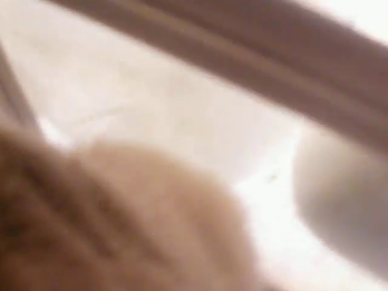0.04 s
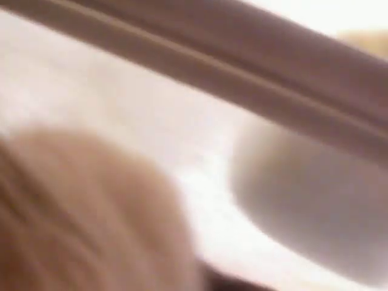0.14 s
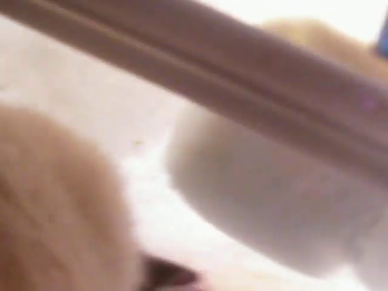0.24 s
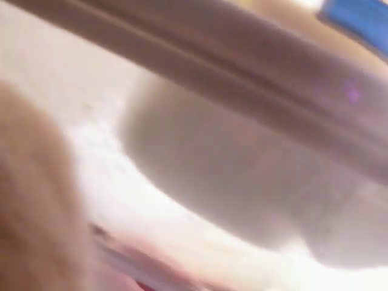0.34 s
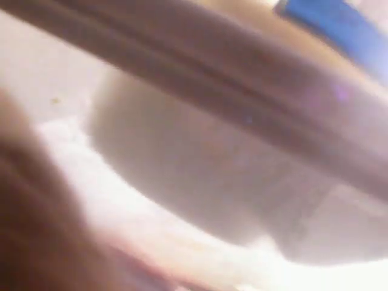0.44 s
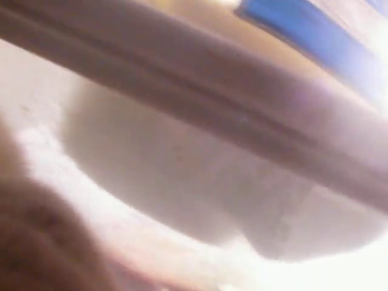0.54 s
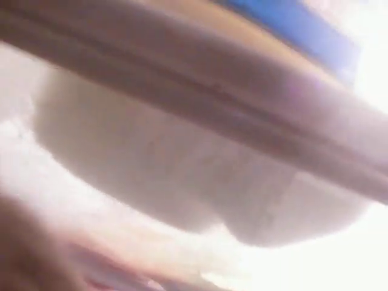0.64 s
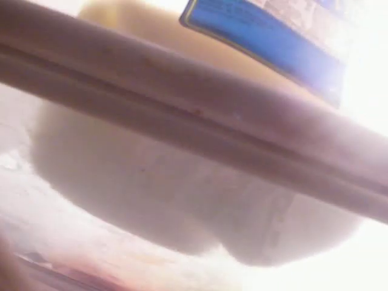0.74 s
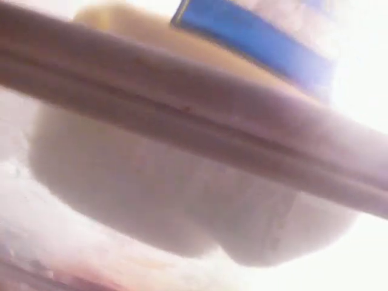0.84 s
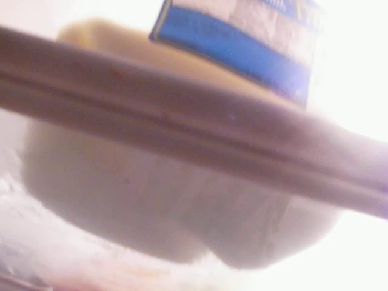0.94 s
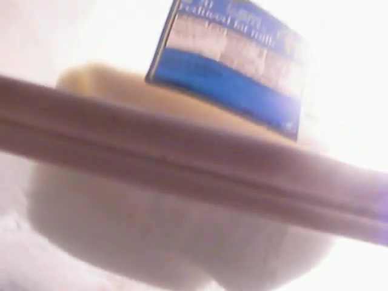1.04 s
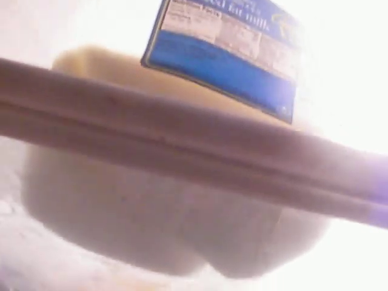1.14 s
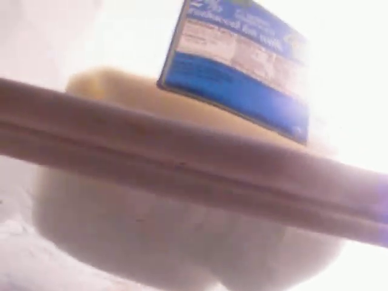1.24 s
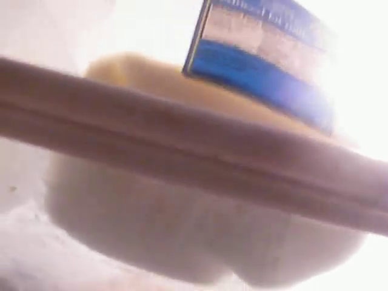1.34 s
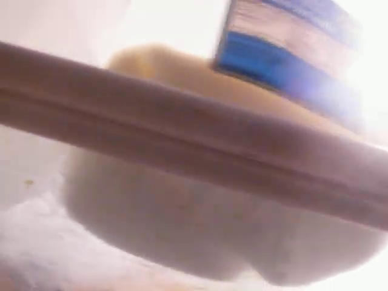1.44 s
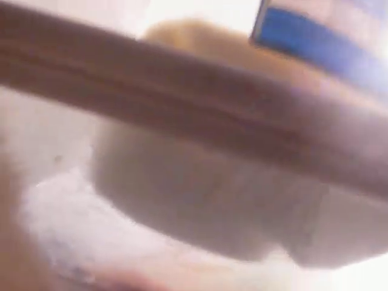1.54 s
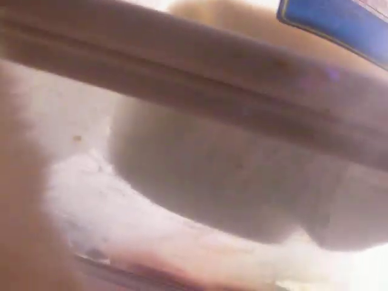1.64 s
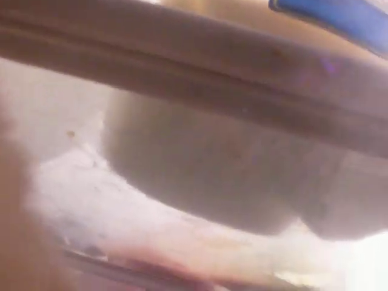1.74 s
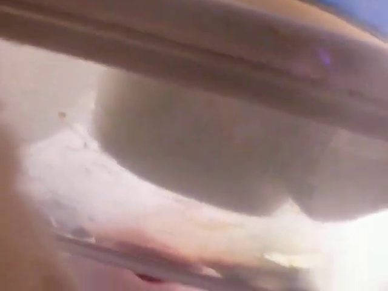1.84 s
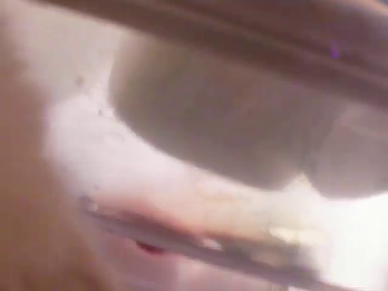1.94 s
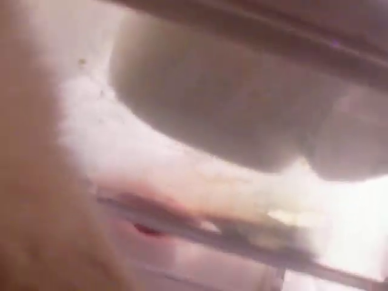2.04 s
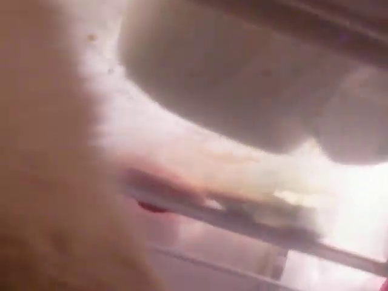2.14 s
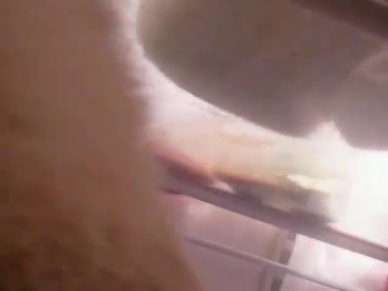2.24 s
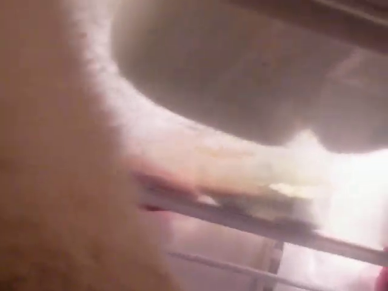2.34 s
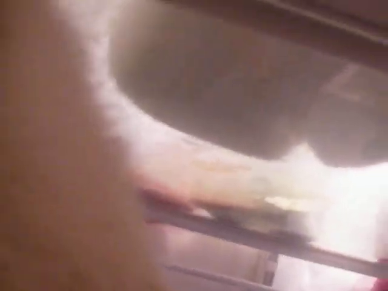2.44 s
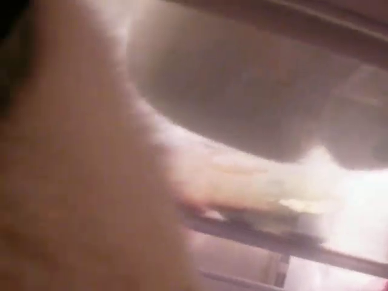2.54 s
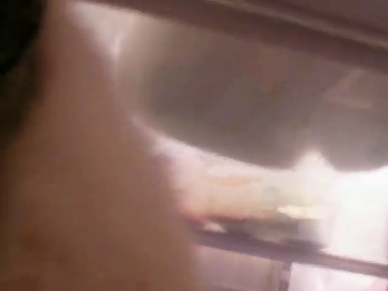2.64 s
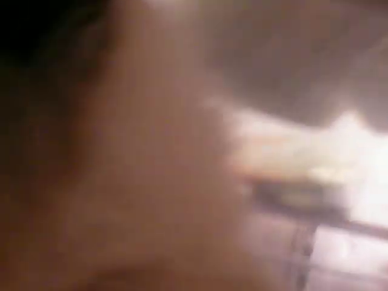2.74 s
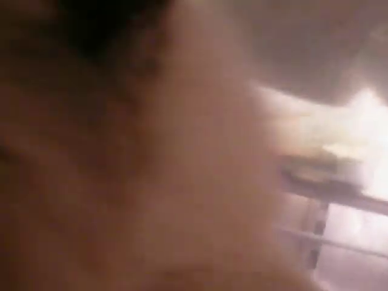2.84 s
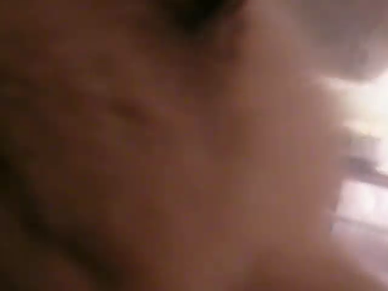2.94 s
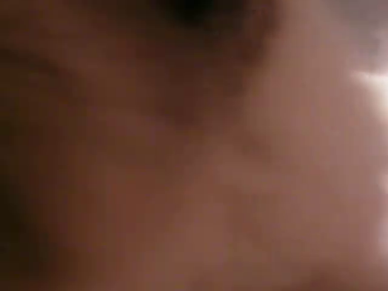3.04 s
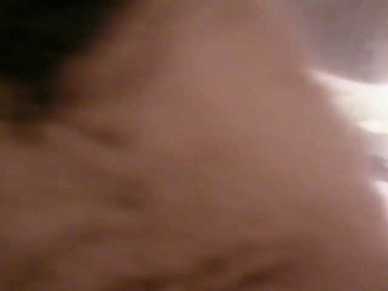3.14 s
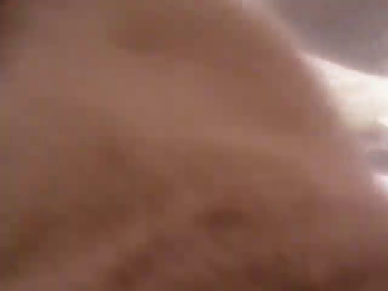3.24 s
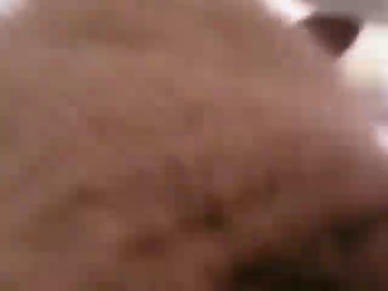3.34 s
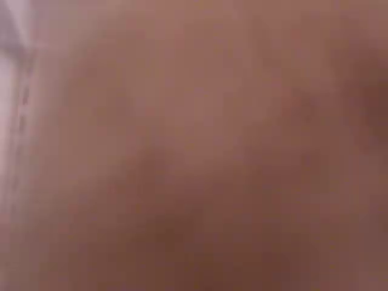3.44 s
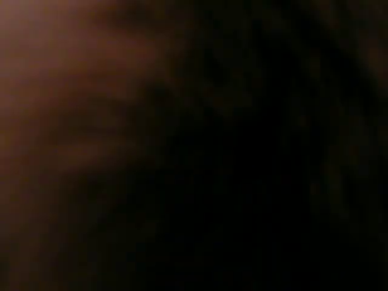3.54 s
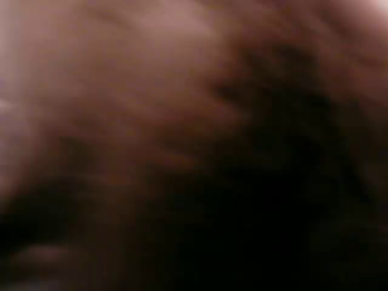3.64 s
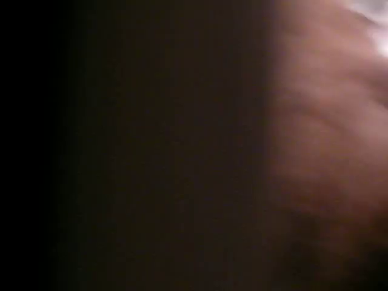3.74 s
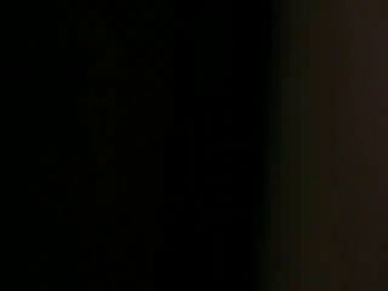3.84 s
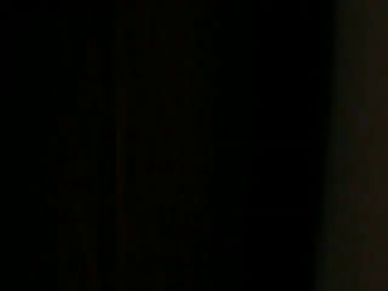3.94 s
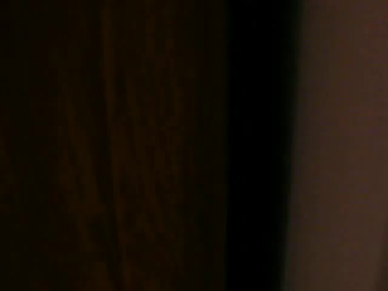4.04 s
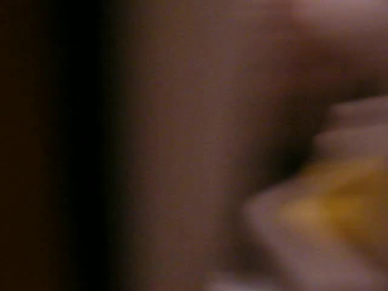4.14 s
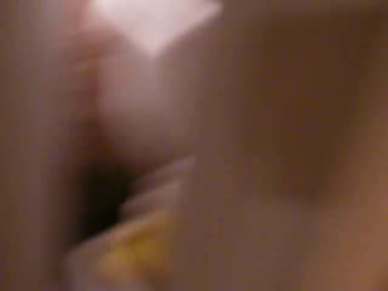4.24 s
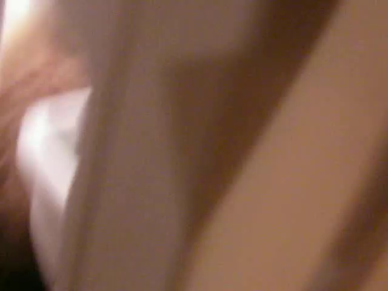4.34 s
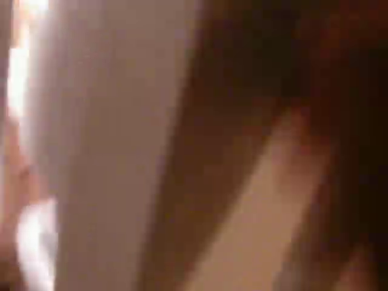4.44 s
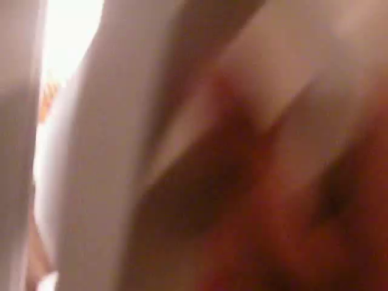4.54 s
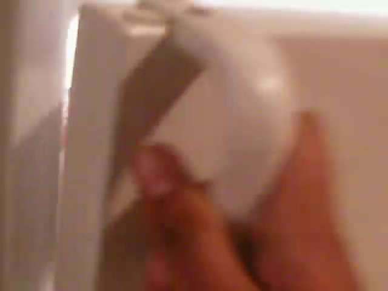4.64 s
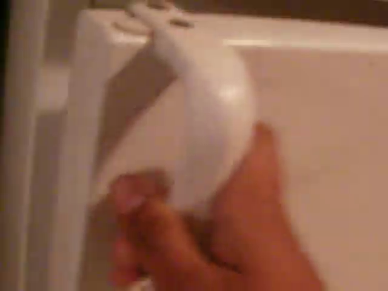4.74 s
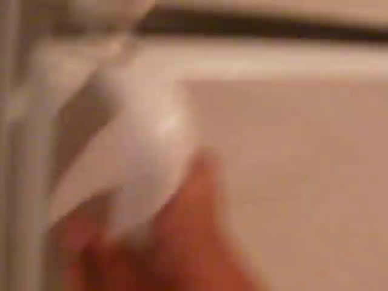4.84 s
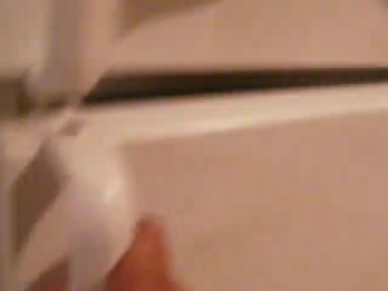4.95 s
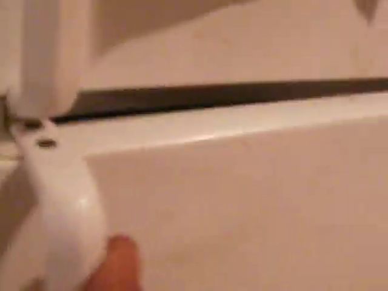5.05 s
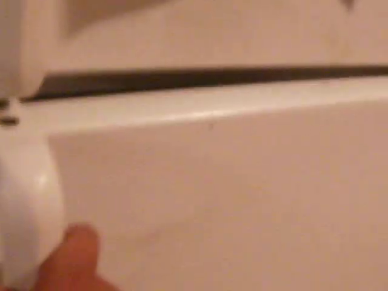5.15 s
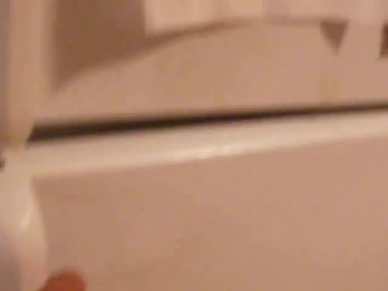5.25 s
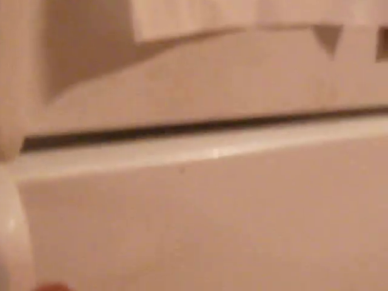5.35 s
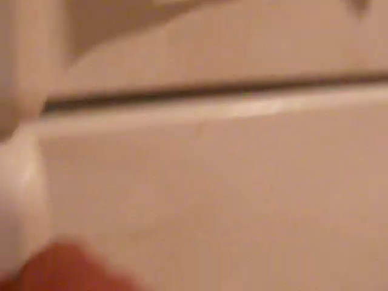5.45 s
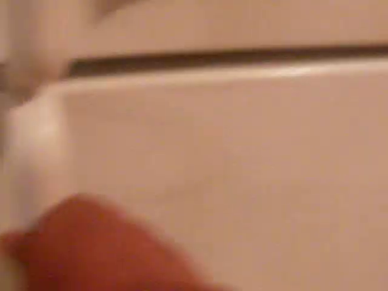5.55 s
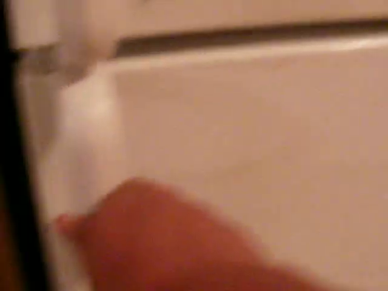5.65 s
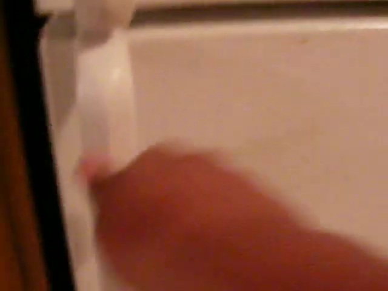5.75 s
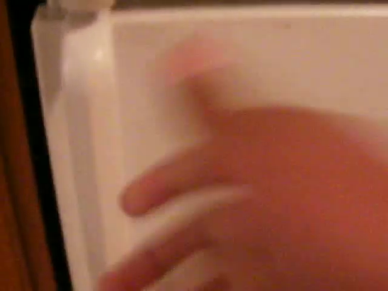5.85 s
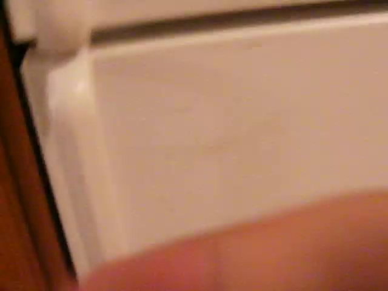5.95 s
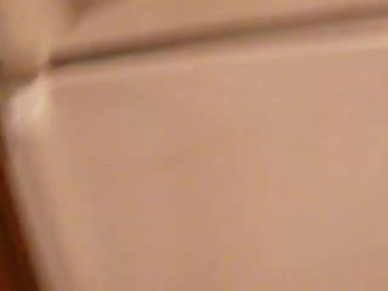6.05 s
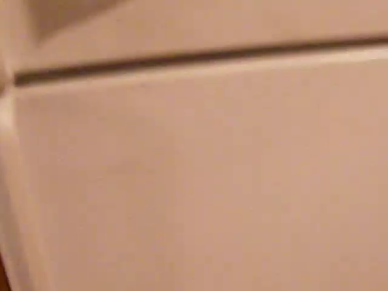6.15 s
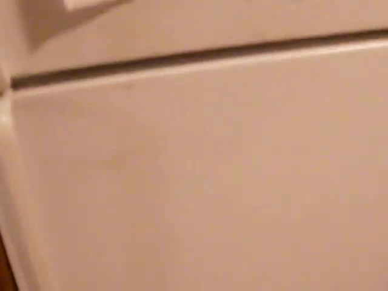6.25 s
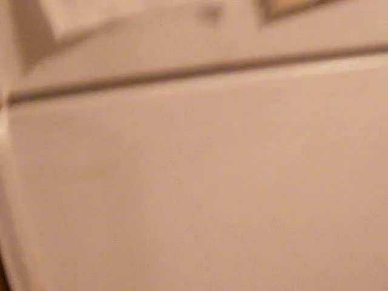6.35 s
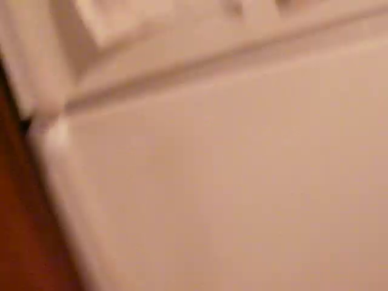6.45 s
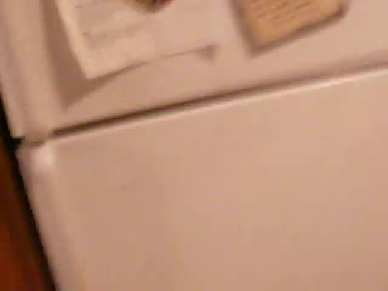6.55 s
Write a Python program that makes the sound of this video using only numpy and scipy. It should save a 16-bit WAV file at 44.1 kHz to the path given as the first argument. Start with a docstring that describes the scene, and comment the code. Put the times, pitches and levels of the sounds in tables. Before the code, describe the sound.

A refrigerator fan drones while shelves are bumped, fur and cloth brush close by, and the door knocks, swings shut rattling, then quiets to light rubs.

```python
"""An open refrigerator in a kitchen, close to a hand-held camera; its fan drones throughout.
First its shelves and liner are bumped (filtered noise bursts and decaying sines) and jars tock.
Fur and sleeves brush past (swells of grainy noise); then the door is grabbed, with snaps and harder knocks.
From 4.7 s it swings shut, its load rattling and clinking in a shower of tiny collisions.
Once it is shut the moving air is softer, under a few last rubs, snaps and bumps."""
import sys
import numpy as np
from scipy import signal
from scipy.fft import rfft, irfft, next_fast_len
from scipy.io import wavfile
from scipy.ndimage import map_coordinates

SR = 44100
rng = np.random.default_rng(int(sys.argv[2]) if len(sys.argv) > 2 else 0)


def unload_audio(sound):
    """Save the sound as a 16-bit wav file, at the path given as the first command line argument."""
    columns = np.transpose(np.atleast_2d(sound))
    # keep every value between -1 and 1, then stretch to whole-number steps
    steps = np.round(np.clip(columns, -1, 1) * 32767)
    wavfile.write(sys.argv[1], SR, steps.astype(np.int16))


N = 291050  # 6.6 s

# spectrum of a dull thud: freq_hz [Hz], gain_db [dB, relative]
THUD_SPECTRUM = [(25, -28), (60, -22.5), (110, -7), (160, -8.5), (260, -54), (800, -104)]
# stereo width of close sounds: freq_hz [Hz], side_db [dB on the side signal]
NEAR_WIDTH = [(60, -18.5), (200, -29), (700, -28), (1300, -19), (2300, -8), (4200, -0.5), (14000, -8)]
# stereo width of thuds: freq_hz [Hz], side_db [dB on the side signal]
THUD_WIDTH = [(50, -10), (110, -12), (220, 5.5)]
# stereo width of brushing: freq_hz [Hz], side_db [dB on the side signal]
CLOTH_WIDTH = [(300, -30), (1200, -10.5), (2500, -4), (5000, 2), (14000, -1.5)]


def amp(db):
    """Decibels to gain."""
    return 10 ** (np.asarray(db) / 20)


def unit(x):
    """Scale to rms 1."""
    return x / np.sqrt(np.mean(x ** 2) + 1e-20)


def along(points, hz):
    """Gain of (Hz, dB) points joined on a log frequency axis."""
    freq_hz, gain_db = np.transpose(points)
    return amp(np.interp(np.log(hz + 1), np.log(freq_hz + 1), gain_db))


def around(hz, centre_hz, octaves):
    """A broad emphasis about one frequency."""
    return 1 / np.sqrt(1 + (np.log2((hz + 1) / centre_hz) / octaves) ** 2)


def curve(rows):
    """One gain per sample from (s, dB) points."""
    return amp(np.interp(np.arange(N) / SR, *np.transpose(rows)))


def wobble(rate):
    """A smooth random curve, rate knots a second."""
    return map_coordinates(rng.standard_normal(1024), [np.arange(N) * rate / SR], mode="wrap")


def ringing(modes, hz):
    """Gain of a set of (Hz, width Hz, dB) resonances, summed by power."""
    power = 0
    for centre, width, db in modes:
        response = amp(db) * hz * width / (centre * centre - hz * hz + 1j * hz * width)
        power = power + np.abs(response) ** 2
    return np.sqrt(power)


def decay(t, t60):
    """Exponential fade of 60 dB in t60 seconds."""
    return amp(-60 * t / t60)


def sine(hz, t):
    """A pure tone."""
    return np.sin(2 * np.pi * hz * t)


def voiced(pair, gain, width, lead=0):
    """Colour a mid and side excitation causally, and turn it to left and right."""
    n = pair.shape[1]
    m = 2 * next_fast_len(n // 2 + 4096)
    hz = np.fft.rfftfreq(m, 1 / SR)
    # folding the cepstrum makes the filter minimum phase: nothing sounds before its cause
    cepstrum = irfft(np.log(gain(hz) + 1e-6))
    cepstrum[1:m // 2] *= 2
    cepstrum[m // 2 + 1:] = 0
    mid, side = rfft(pair, m) * np.exp(rfft(cepstrum))
    side = side * along(width, hz)
    turn = np.exp(1j * np.pi * hz * lead)  # the left port hears it lead seconds earlier
    return irfft(np.array([(mid + side) * turn, (mid - side) / turn]), m)[:, :n]


def noise(size):
    """Two unrelated white noises."""
    return rng.standard_normal((2, size))


def gritty(size, spread_db):
    """Noise whose half-millisecond grains differ in strength."""
    grain = np.repeat(rng.standard_normal(size // 22 + 1), 22)[:size]
    return noise(size) * amp(spread_db * grain)


def add(track, s, sound):
    """Mix a sound in at a time."""
    i = max(round(s * SR), 0)
    track[:, i:i + sound.shape[1]] += sound[:, :N - i]


def blow(gain, width, contact, t60, room_db, room_t60, lead=0, grit_db=0.7):
    """A coloured burst that rises over the contact time, dies fast and leaves a weaker tail."""
    t = np.arange(SR // 2) / SR
    fade = decay(t, t60) + amp(room_db) * decay(t, room_t60)
    shape = (1 - np.exp(-t / contact)) * fade
    x = voiced(gritty(len(t), grit_db) * shape, gain, width, lead)
    return x / np.sqrt(np.mean(x[:, :SR // 30] ** 2))  # rms 1 over the first 33 ms


def cabinet(hz):
    """The hollow cabinet answers only in the bass."""
    # cabinet resonances: centre_hz [Hz], width_hz [Hz], level_db [dB]
    cabinet_modes = [(169.5, 18, -11.5), (199, 20, -10.5), (263, 38, -7.5), (292, 41, -9), (407, 37, -15.5),
                     (447, 25, -23)]
    return ringing(cabinet_modes, hz) / (1 + (hz / 520) ** 4)


def liner(hz):
    """Plastic walls and shelves: a few strong modes over a flat floor that stands for many weak ones."""
    # liner resonances: centre_hz [Hz], width_hz [Hz], level_db [dB]
    liner_modes = [(588, 19, 3.5), (725, 32, 9.5), (744, 36, 9), (1000, 31, 1), (1110, 94, 1),
                   (1190, 54, 4), (1616, 80, 5.5), (1960, 80, -11)]
    return 0.77 + ringing(liner_modes, hz)


def stiff(hz):
    """The higher resonances of small plastic parts, over a flat floor."""
    # small-part resonances: centre_hz [Hz], width_hz [Hz], level_db [dB]
    part_modes = [(1750, 42, -8), (2110, 210, -1.5), (2740, 150, -3.5), (3130, 35, -1), (3606, 56, -0.5),
                  (4870, 89, -12), (6350, 96, -5.5)]
    return 1.46 + ringing(part_modes, hz)


def fan():
    """Moving air is shaped noise; the blades drone on a wavering tone in narrow noise, over a faint mains hum."""
    # level of the drone: time_s [s], level_db [dB]
    drone_level = [(0, -35.5), (.85, -39), (1.33, -35), (1.42, -39), (2.3, -41), (3.1, -38.5), (4.0, -44.5),
                   (5.8, -47.5), (6.3, -41.5)]
    # level of the moving air, lower once the door is shut: time_s [s], level_db [dB]
    flow_level = [(0, -39), (.85, -41), (1.15, -44.5), (1.8, -41.5), (2.6, -40.5), (3.15, -39.5),
                  (3.7, -39.5), (4.6, -42.5), (5.65, -45), (5.9, -46.5)]
    # spectrum of the moving air: freq_hz [Hz], gain_db [dB, relative]
    air_spectrum = [(25, -26), (60, -8), (120, -1.5), (240, 9.5), (320, -2), (375, -6), (460, -4.5),
                    (600, 0), (850, 0), (1300, -12.5), (3000, -38.5), (14000, -38)]
    # stereo width of the sound filling the room: freq_hz [Hz], side_db [dB on the side signal]
    diffuse_width = [(40, -29), (110, -6), (300, -8.5), (700, -24), (1300, -6), (2500, 15.5), (14000, 4)]
    t = np.arange(N) / SR
    flow = unit(voiced(noise(N), lambda hz: along(air_spectrum, hz), diffuse_width))
    unsteady = amp(2.2 * wobble(8))
    blades = unit(voiced(noise(N), lambda hz: ringing([(290.7, 40.0, 0)], hz) ** 2, diffuse_width))
    tone = np.sin(2 * np.pi * 296 * t + 0.88 * wobble(7.8))
    hum = amp(-55.5) * np.sin(2 * np.pi * 120 * t + 0.94 * wobble(2.816))
    return curve(flow_level) * unsteady * flow + curve(drone_level) * (0.37 * blades + 0.84 * tone) + hum


def handling():
    """The camera body rumbles faintly in an unsteady hand, differently at each port."""
    # level of the rumble before its waver: time_s [s], level_db [dB]
    grip_level = [(0, -51), (.6, -47), (1.2, -57), (3.5, -48.5), (4.3, -66), (5.7, -61), (6.6, -57)]
    body = lambda hz: along(THUD_SPECTRUM, hz) * around(hz, 56, 0.22)
    rumble = unit(voiced(noise(N), body, [(100, -11.0)]))
    return curve(grip_level) * amp(3 * wobble(9.8)) * rumble


def brushing():
    """Cloth and fur slide past: each stroke swells and fades, a rasp under a fine fizz; quick ones rasp higher."""
    # strokes: middle_s [s], rasp_db [dB], fizz_db [dB over the rasp], half_length_s [s]
    stroke_rows = [(0.072, -28.5, -5, 0.013), (0.237, -36, 5, 0.0072), (0.354, -37.5, -15, 0.0088),
                   (0.411, -38, -10, 0.017), (0.52, -30.5, 0.5, 0.025), (1.254, -43.5, 2.5, 0.076),
                   (1.337, -44.5, -2, .022), (1.867, -37.5, -2, 0.014), (2.177, -54.5, 17, .005),
                   (2.57, -46.5, 5, 0.0048), (2.883, -41, 3, 0.01), (2.993, -40, -9, 0.012),
                   (3.288, -42, 6, 0.008), (3.361, -31, -16, 0.028), (3.38, -23.5, -1.5, 0.011),
                   (3.407, -41, 10, 0.0048), (3.515, -29, -10, 0.015), (3.699, -24, -2.5, 0.011),
                   (3.907, -24, -10, 0.0057), (4.094, -30.5, -5, 0.019), (4.184, -33, -2.5, 0.14),
                   (4.28, -32, -5.5, 0.086), (4.475, -35.5, -2, 0.0079), (4.674, -21, -1, 0.013),
                   (4.925, -36.5, 4, 0.0053), (4.965, -29, -2, 0.0088), (5.458, -24, 0.5, 0.012),
                   (5.527, -37, -12, 0.046), (5.657, -53, -10, 0.038), (5.79, -45.5, 10.5, 0.016),
                   (5.957, -46, 6.5, 0.018), (6.324, -42.5, 1.5, 0.023)]
    # spectrum of the rasp: freq_hz [Hz], gain_db [dB, relative]
    rasp_spectrum = [(150, -20.5), (480, -4), (800, 3), (1800, 1), (2700, -2), (3600, -1), (6000, -5.5),
                     (8000, -20), (11000, -57)]
    # spectrum of the fizz: freq_hz [Hz], gain_db [dB, relative]
    fizz_spectrum = [(3000, -69), (7000, 2.5), (10000, 2), (12500, 3.5), (14000, -1.5)]
    quick_s, quick_hz = 0.018, 3100  # strokes shorter than this lean to a rasp about this centre
    t = np.arange(N) / SR
    # a faint wavering rustle lies under all the strokes
    rustle = amp(2 * wobble(4.02))
    slow, quick, fizz = amp(-46.5) * rustle, np.zeros(N), amp(-50) * rustle
    for middle_s, rasp_db, fizz_db, length in stroke_rows:
        near = np.abs(t - middle_s) < 6 * length
        stroke = amp(rasp_db) * np.exp(-np.abs((t[near] - middle_s) / length) ** 1.04)
        quick_share = 1 / (1 + (length / quick_s) ** 2)
        quick[near] += np.sqrt(quick_share) * stroke
        slow[near] += np.sqrt(1 - quick_share) * stroke
        fizz[near] += amp(fizz_db) * stroke

    fibres = lambda gain: unit(voiced(gritty(N, spread_db=2.5), gain, CLOTH_WIDTH))
    rough = lambda hz: along(rasp_spectrum, hz) * stiff(hz)
    rasp = fibres(rough)
    # a slow, firm stroke also stirs the cabinet's main mode
    main_mode = lambda hz: ringing([(242.6, 50.0, 0)], hz) ** 2
    stirred = amp(-7.0) * unit(voiced(noise(N), main_mode, NEAR_WIDTH))
    scrape = fibres(lambda hz: rough(hz) * around(hz, quick_hz, 2.5) ** 2)
    fine = fibres(lambda hz: along(fizz_spectrum, hz))
    return slow * (rasp + stirred) + quick * scrape + fizz * fine


def rubs():
    """Skin drags over plastic, sticking and slipping, and excites a narrow group of its resonances."""
    # rubs, each spot with its own tone: middle_s [s], level_db [dB], centre_hz [Hz], half_length_s [s]
    rub_rows = [(0.491, -28.5, 2800, 0.01), (3.333, -34, 730, 0.031), (3.381, -32, 1080, .01),
                (5.467, -29, 3030, 0.013), (5.509, -32, 3460, 0.043), (6.264, -37.5, 1870, 0.066),
                (6.284, -31, 1760, .005), (6.336, -34, 1950, 0.018), (6.473, -37.5, 1780, 0.015),
                (6.558, -37.5, 1600, 0.024)]
    catches_per_s, catch_db = 140, 3
    out, t = np.zeros((2, N)), np.arange(SR // 2) / SR - .25  # time from the middle of the stroke
    for middle_s, db, centre_hz, length in rub_rows:
        spot = lambda hz: liner(hz) * stiff(hz) * around(hz, centre_hz, 0.49) ** 2
        drag = unit(voiced(gritty(len(t), spread_db=4.5), spot, CLOTH_WIDTH))
        catches = amp(catch_db * wobble(catches_per_s)[:len(t)])
        swell = np.exp(-np.abs(t / length) ** 1.02)
        add(out, middle_s + t[0], amp(db) * swell * unit(catches * drag))
    return out


def tocks():
    """A nudged jar or bin rings briefly on one decaying note."""
    # tocks: start_s [s], level_db [dB], pitch_hz [Hz], t60_s [s]
    tock_rows = [(.068, -18.5, 2020, .018), (0.5757, -8.5, 1150, 0.018), (.579, -23.5, 1044, .09),
                 (.584, -23, 1260, .07), (1.556, -25, 1490, 0.014), (2.029, -20.5, 1500, 0.027),
                 (2.036, -25, 775, .09), (2.048, -23.5, 789, 0.19), (3.77, -24, 400, 0.1),
                 (3.86, -20, 944, 0.053), (5.084, -19, 1047, 0.12), (5.431, -28, 618, 0.17),
                 (5.443, -28.5, 710, 0.15), (5.957, -36, 1800, .04), (6.033, -31, 1910, 0.033),
                 (6.051, -35, 1460, .03)]
    out, t = np.zeros((2, N)), np.arange(SR // 4) / SR
    for s, db, hz, t60 in tock_rows:
        note = amp(db) * sine(hz, t) * decay(t, t60)
        add(out, s, note[None])
    return out


def snaps():
    """Small plastic parts snap: a very brief ring that may reach one microphone port first."""
    # snaps: start_s [s], level_db [dB, of the ring], pitch_hz [Hz], t60_s [s],
    # pan_db [left minus right, dB], lead_s [lead of the left port, s]
    snap_rows = [(3.3868, 1, 2130, 0.0032, 2, .0001), (3.5228, 3, 4270, 0.0013, -8, -.00004),
                 (3.7564, -4, 3280, 0.0015, -11, 0), (3.8575, -13, 2590, .003, -3, 0),
                 (4.6623, -6, 2080, .005, 0, 0), (4.6793, -5.5, 4040, 0.0035, 2, 0),
                 (5.4529, -0.5, 3760, 0.0015, 2.5, 0), (5.458, -6.5, 4600, .004, 5, .00002),
                 (5.647, -32, 5540, 0.0074, 0, 0), (5.7835, -23, 1300, 0.0075, -1, 0),
                 (5.785, -28, 5400, 0.0056, 0, 0), (6.033, -17.5, 1910, .016, -7, .0002),
                 (6.4664, -20.5, 5400, 0.0026, -12, .00005)]
    out, t = np.zeros((2, N)), np.arange(SR // 20) / SR
    ports = np.array([[1], [-1]])  # left, right
    for s, db, hz, t60, pan_db, lead in snap_rows:
        age = np.maximum(t - np.maximum(-ports * lead, 0), 0)
        ring = sine(hz, age) * decay(age, t60)
        # the higher the pitch, the more it ticks and splinters
        tick = 0.7 * sine(11000, age) * decay(age, 0.0011)
        splinter = noise(len(t)) * (0.23 * decay(t, 0.0017) + 0.017 * decay(t, 0.026))
        sharpness = (hz / 4500) ** 1.2
        add(out, s, amp(db + ports * pan_db / 2) * (ring + (tick + splinter) * sharpness))
    return out


def bumps():
    """A heavy, padded contact gives only a low thump with a brief hollow note."""
    # bumps: start_s [s], level_db [dB, before the thump and note balance], centre_hz [Hz], t60_s [s, of the note]
    bump_rows = [(0.225, -30.5, 90, 0.18), (.489, -19.5, 113.5, 0.1), (3.39, -18.5, 172.6, 0.29),
                 (3.481, -21.5, 139, 0.094), (4.794, -22.5, 152, 0.28), (5.007, -21.5, 127, 0.14),
                 (5.445, -42, 110, 0.27), (5.959, -21.5, 112, 0.039), (6.037, -25.5, 100, 0.033),
                 (6.467, -34, 133, 0.076)]
    out, t = np.zeros((2, N)), np.arange(SR // 2) / SR
    for s, db, centre_hz, t60 in bump_rows:
        dull = lambda hz: around(hz, centre_hz, 0.56) ** 3 / (1 + (hz / 420) ** 4)
        thump = blow(dull, THUD_WIDTH, contact=0.00065, t60=.5 * t60, room_db=-19, room_t60=5 * t60)
        note = sine(centre_hz, t) * (1 - np.exp(-t / 0.0031)) * decay(t, t60)
        add(out, s, amp(db) * (amp(-7.0) * thump + amp(0.5) * note))
    return out


def swing():
    """The door's load chatters and clinks against its bins and shakes the cabinet while the door moves."""
    # spectrum of the chatter: freq_hz [Hz], gain_db [dB, relative]
    rattle_spectrum = [(200, -26), (420, -14), (650, -5), (1400, -2.5), (2100, -2.5), (3300, -8),
                       (5500, -22), (9000, -30), (14000, -33)]
    from_s, rise_s, until_s = 4.68, 0.013, 5.09
    grows_db_per_s, boom_fall_db_per_s, rattle_fall_db_per_s = 4, 64, 81
    clink_count, clink_span_s, clink_db, clink_spread_db = 30, .55, -25, 4
    clink_hz, clink_octaves, clink_t60_s = 1090, 0.63, .028  # middle pitch, spread either way, ring
    t = np.arange(N) / SR
    # the motion starts, gathers speed, then dies away
    late = t - until_s
    lurch = np.clip((t - from_s) / rise_s, 0, 1) * amp(1.5 * wobble(22.1))
    moving = lambda fall: lurch * amp(np.minimum(grows_db_per_s * late, -fall * late))
    shaking = moving(rattle_fall_db_per_s)

    # tiny collisions of uneven strength, about 150 a second, each dying within a few milliseconds
    hits = (rng.random(N) < 150 / SR) * amp(3.0 * rng.standard_normal(N))
    jolts = .5 + signal.lfilter([1], [1, -np.exp(-1 / (0.0026 * SR))], hits)
    hollow = lambda hz: cabinet(hz) * hz ** 2 / (hz ** 2 + 90 ** 2)
    bins = lambda hz: along(rattle_spectrum, hz) * liner(hz) * stiff(hz)
    boom = unit(voiced(noise(N), hollow, NEAR_WIDTH))
    chatter = unit(voiced(jolts * gritty(N, spread_db=0.5), bins, NEAR_WIDTH))
    out = amp(-30) * moving(boom_fall_db_per_s) * boom + amp(-31) * shaking * chatter

    # larger collisions each ring one jar or bin on its own note
    age = t[:SR // 10]
    for when, pitch, size in rng.uniform(-1, 1, (clink_count, 3)):
        s = from_s + (1 + when) / 2 * clink_span_s
        ring = sine(clink_hz * 2 ** (clink_octaves * pitch), age) * decay(age, clink_t60_s)
        add(out, s, shaking[round(s * SR)] * amp(clink_db + clink_spread_db * size) * ring[None])
    return out


def knocks():
    """Each blow cracks at the contact, clacks in the liner, booms in the cabinet and thuds in the floor."""
    # knocks on shelves and door: start_s [s], level_db [dB, before the balance of the parts],
    # boom_db [dB, boom trim], crack_db [dB, crack trim], clack_hz [centre, Hz], contact_s [s], boom_hz [pitch, Hz]
    knock_rows = [(.038, -22, 1, -10.5, 720, 0.0029, 277.8), (.066, -26, -2, -11, 1700, 0.0012, 281),
                  (.199, -27, 1, -8, 915, 0.0066, 266), (.228, -27, -2, -8, 800, 0.0023, 295),
                  (.478, -30, -2, -1, 780, 0.0016, 272), (.496, -30.5, 12.5, -3, 1200, 0.0048, 280),
                  (0.5112, -30, -2, 4, 1300, 0.00057, 287), (.575, -25, -9, -3.5, 1116, .0006, 258),
                  (.622, -32.5, 2, -6, 1150, 0.0033, 239), (.917, -36.5, -3, -9, 847, .002, 246),
                  (1.553, -29, -3, -7.5, 840, 0.003, 261), (2.025, -24, -5, -6.5, 770, 0.0032, 290),
                  (2.067, -37, 3, -24, 700, .0013, 287), (2.264, -28.5, 1.5, -9.5, 753, 0.0016, 238.4),
                  (2.837, -27.5, -2, -27, 975, 0.00058, 277), (2.869, -29, -9, -4, 940, 0.0008, 275),
                  (2.926, -31, 4, -9, 900, .0025, 251), (2.976, -33.5, -7, -5.5, 900, 0.0012, 268),
                  (3.386, -25.5, -3, 5.5, 2100, 0.00065, 243), (3.475, -20, -1, -11, 940, 0.0021, 264.4),
                  (3.678, -29, -5, 3, 1010, 0.0026, 257), (3.755, -15.5, -14, -4, 840, 0.0013, 250),
                  (3.772, -29.5, 12.5, -8, 803, 0.0066, 236), (3.819, -24.5, 5, -5, 790, 0.0043, 290),
                  (3.856, -16.5, -3.5, -4.5, 935, 0.0016, 233), (3.898, -23.5, 4, -8, 814, 0.0046, 237),
                  (4.081, -24, -10, 1.5, 2040, 0.0015, 248), (4.585, -44, 9.5, -10, 785, 0.0046, 232),
                  (4.6605, -18.5, 0, -4.5, 1950, 0.0009, 228), (4.677, -22.5, 0, -1.5, 1590, 0.0012, 258),
                  (4.766, -30, 8.5, -2, 1005, 0.004, 243), (4.786, -15.5, -1.5, -11, 905, 0.0017, 259),
                  (4.81, -22, -1, -6, 900, 0.00075, 198), (4.859, -22, 2.5, -7, 1300, 0.0011, 229),
                  (4.908, -28, 9.5, -9, 860, 0.0034, 246), (4.959, -20, 5, -2.5, 1490, 0.0058, 317),
                  (4.996, -17.5, -9, -9, 1140, 0.0025, 253), (5.01, -23.5, 9.5, -9, 600, 0.0014, 229.6),
                  (5.039, -25, 6.5, -4.5, 1000, 0.0039, 242), (5.074, -26, 7, -23, 900, 0.004, 278.4),
                  (5.084, -25.5, -2, -19, 1030, .0015, 252), (5.112, -22.5, 0.5, -8.5, 1030, 0.0055, 245),
                  (5.155, -26.5, 6, -11, 1010, 0.0039, 229), (5.195, -35.5, 12, -23, 900, .004, 245.5),
                  (5.452, -37.5, -4, 1, 890, 0.0032, 256), (5.782, -43, -6, 3, 900, 0.00055, 285),
                  (5.957, -37.5, 2, -4, 890, 0.0033, 261), (6.031, -36.5, -6, 0.5, 800, 0.0018, 277),
                  (6.052, -51, -11, -13, 1450, 0.00064, 280)]
    # spectrum of the clack: freq_hz [Hz], gain_db [dB, relative]
    clack_spectrum = [(200, -35), (420, 12), (650, 1), (1400, 2.5), (2100, -5.5), (3500, -16), (9000, -44)]
    # spectrum of the crack: freq_hz [Hz], gain_db [dB, relative]
    crack_spectrum = [(700, -40), (1900, 2.5), (3300, -2), (5000, -3.5), (7000, -9.5), (10000, -13),
                      (14000, -14.5)]
    typical_contact_s, typical_t60_s = 0.0018, 0.12
    out, t = np.zeros((2, N)), np.arange(SR // 2) / SR
    for s, db, boom_db, crack_db, clack_hz, contact, boom_hz in knock_rows:
        t60 = typical_t60_s * (contact / typical_contact_s) ** 0.87  # a softer contact rings longer
        lead = rng.uniform(-0.000077, .0001)
        # the place of the blow favours some of the modes
        hollow = lambda hz: cabinet(hz) * around(hz, boom_hz, 0.74) ** 2
        panel = lambda hz: along(clack_spectrum, hz) * liner(hz) * around(hz, clack_hz, 0.5)
        edge = lambda hz: along(crack_spectrum, hz) * stiff(hz)
        floor = lambda hz: along(THUD_SPECTRUM, hz)
        thud = blow(floor, THUD_WIDTH, contact, t60=0.24, room_db=-32, room_t60=.1)
        boom = blow(hollow, NEAR_WIDTH, contact, t60=0.066, room_db=-8, room_t60=0.64, lead=lead)
        clack = blow(panel, NEAR_WIDTH, contact, t60, room_db=-9.5, room_t60=0.46, lead=lead, grit_db=3.0)
        crack = blow(edge, NEAR_WIDTH, contact, 0.58 * t60, room_db=-15.5, room_t60=0.41, lead=lead, grit_db=4)
        # the favoured mode speaks at once
        note = sine(boom_hz, t) * (1 - np.exp(-t / 0.0046)) * decay(t, 0.18)
        # the cabinet's main mode sings on faintly behind it, faded out by half a second
        sing = np.sin(2 * np.pi * (244 * t + rng.random())) * (1 - np.exp(-t / 0.017))
        sing = sing * decay(t, 0.96) * (1 - (2 * t) ** 4)
        low = amp(5) * note + amp(-9.5) * boom + amp(-12) * sing + amp(-22.5) * thud
        add(out, s, amp(db) * (amp(boom_db) * low + amp(-6.5) * clack + amp(crack_db - 5.5) * crack))
    return out


def walls(x):
    """Nearby surfaces throw the sound above the bass back, then the kitchen rings briefly."""
    # early echoes: left_s [s], right_s [s], gain [linear]
    echoes = [(.0021, 0.0024, 0.55), (.0047, 0.0036, 0.15), (.0078, 0.01, 0.09), (0.015, 0.016, 0.099)]
    # decay of the room: freq_hz [Hz], t60_s [s]
    room_decay = [(200, 0.2), (1000, 0.31), (3000, 0.35), (12000, 0.35)]
    bright = signal.sosfilt(signal.butter(2, 500, "high", fs=SR, output="sos"), x)
    out = x.copy()
    for left, right, gain in echoes:
        delayed = [np.pad(c, (round(s * SR), 0))[:N] for c, s in zip(bright, (left, right))]
        out += gain * np.array(delayed)
    # the tail is noise that fades at its own rate in each band
    hz, t, bands = signal.stft(noise(SR // 2), SR, nperseg=256)
    t60 = np.interp(hz, *np.transpose(room_decay))[:, None]
    shape = decay(t, t60) * (1 - np.exp(-t / 0.0034))
    tail = signal.istft(bands * shape, SR, nperseg=256)[1]
    tail /= np.linalg.norm(tail[0])
    return out + amp(-12.5) * signal.fftconvolve(bright, tail, axes=1)[:, :N]


def scene():
    """The refrigerator sits slightly to the right; snaps and handling arrive without the room."""
    fridge = (fan() + bumps() + swing() + knocks()) * amp([[-.7], [.7]])
    return walls(fridge + brushing() + rubs() + tocks()) + snaps() + handling()


def record(dry):
    """The microphone cuts lows and notches treble; the camera ducks after peaks, rounds them and limits the band."""
    duck_above_db, duck_attack_s, recover_db_per_s = -1, 0.013, 36
    t = np.arange(N) / SR
    m = next_fast_len(N + SR // 2)
    hz = np.fft.rfftfreq(m, 1 / SR)
    low_cut = hz ** 2 / (hz ** 2 + 28 ** 2)
    off = (hz - 7900) / 800
    notch = off ** 2 / (1 + off ** 2)
    heard = irfft(rfft(dry, m) * low_cut * notch, m)[:, :N]

    # the excess over the threshold is held, and let go at a steady rate
    peak_db = 20 * np.log10(np.abs(heard).max(axis=0) + 1e-9)
    over_db = np.maximum(peak_db - duck_above_db, 0)
    released_db = recover_db_per_s * t
    held_db = np.maximum.accumulate(over_db + released_db) - released_db
    pole = np.exp(-1 / (duck_attack_s * SR))
    ducked = heard * amp(-signal.lfilter([1 - pole], [1, -pole], held_db))

    rounded = ducked / (1 + np.abs(ducked / .8) ** 6) ** (1 / 6)
    band = 1 / np.sqrt(1 + (hz / 13800) ** 160)  # a steep top at 13.8 kHz
    return irfft(rfft(rounded, m) * band, m)[:, :N]


dry = scene()
out = record(dry)
unload_audio(out)
```